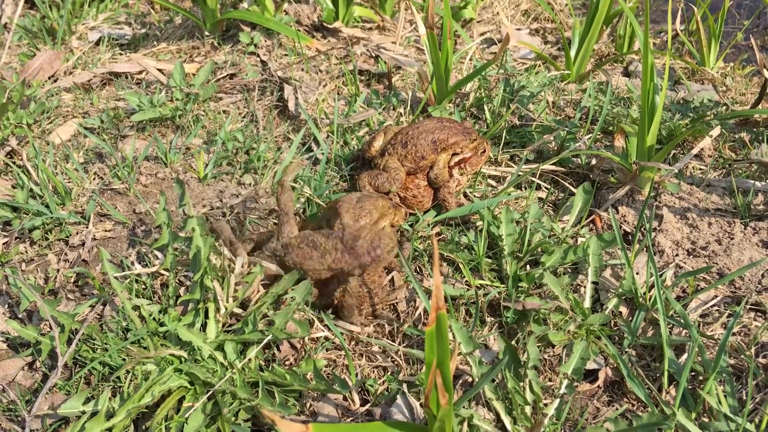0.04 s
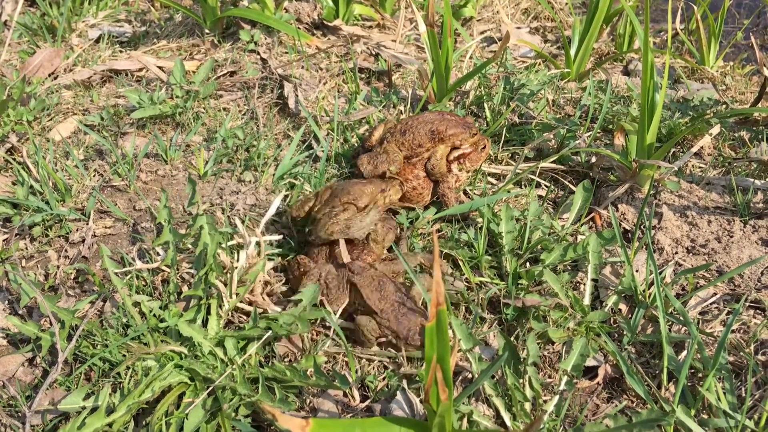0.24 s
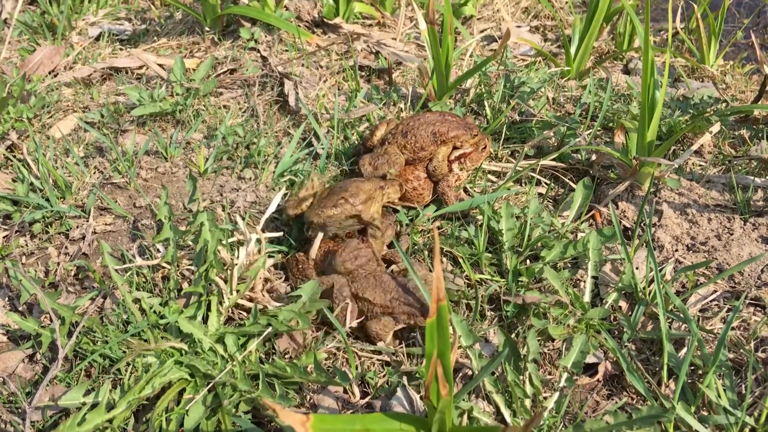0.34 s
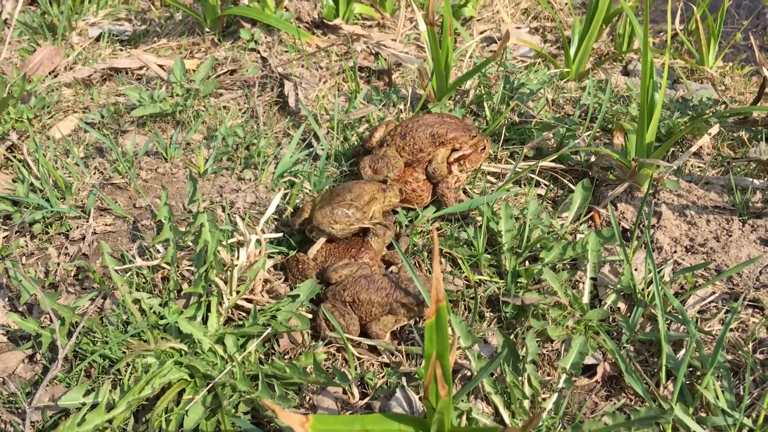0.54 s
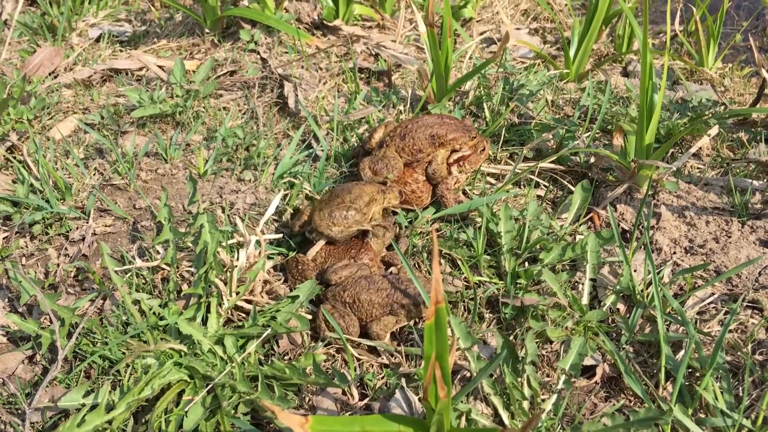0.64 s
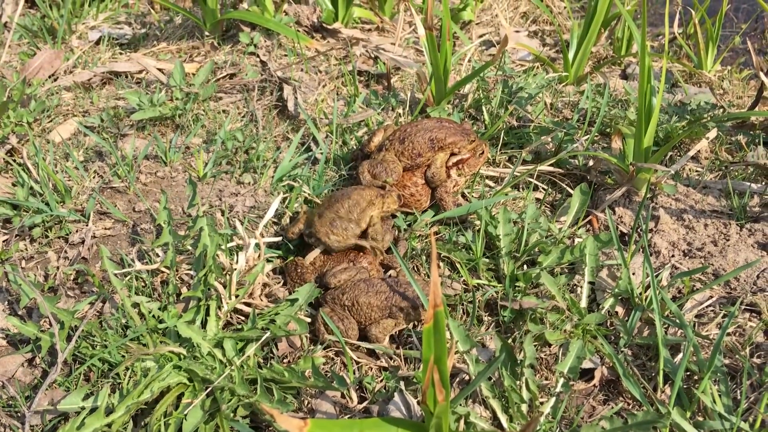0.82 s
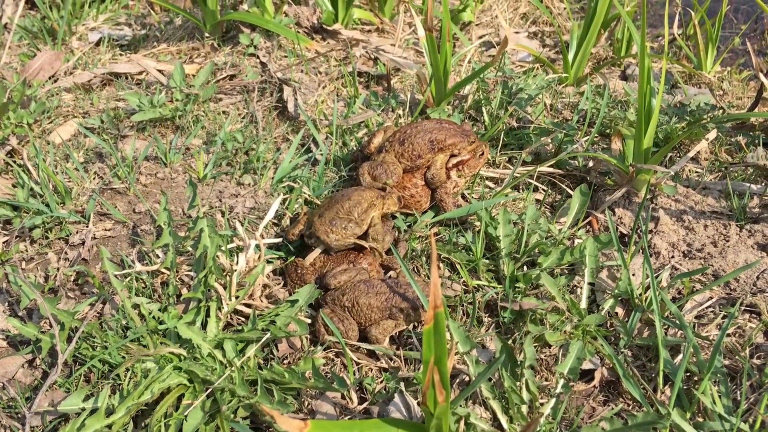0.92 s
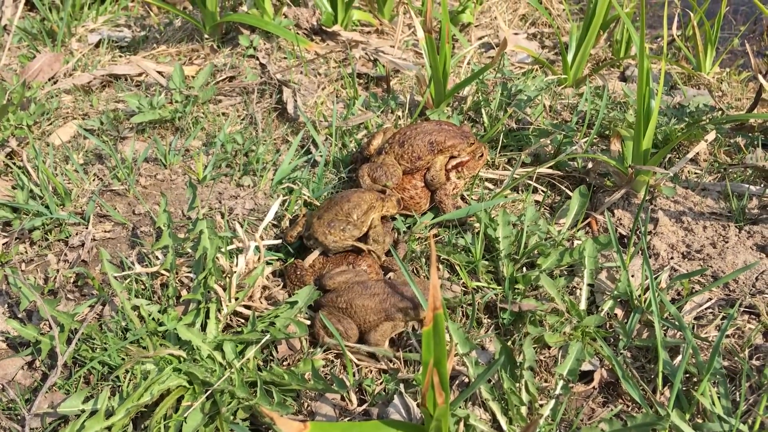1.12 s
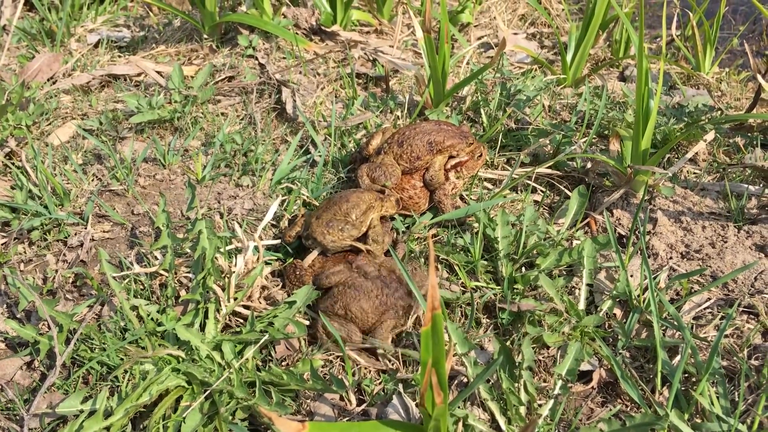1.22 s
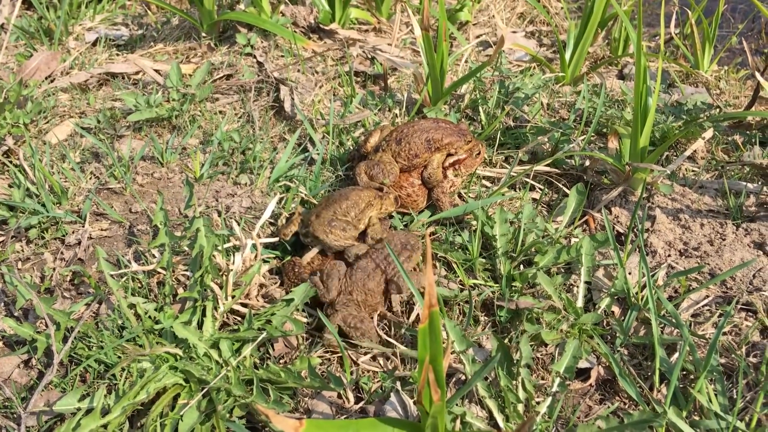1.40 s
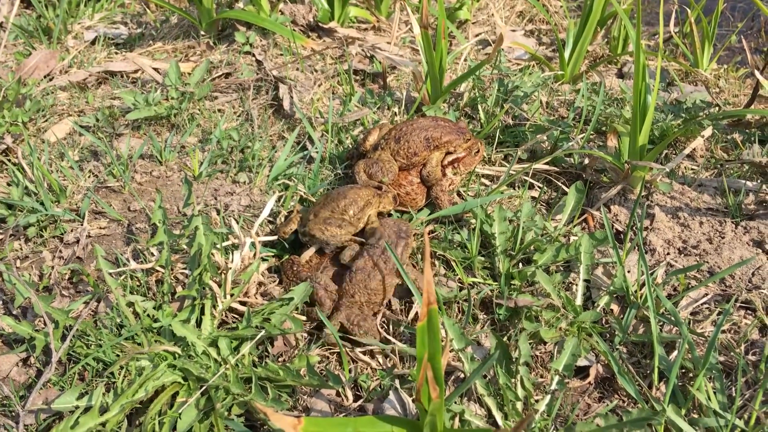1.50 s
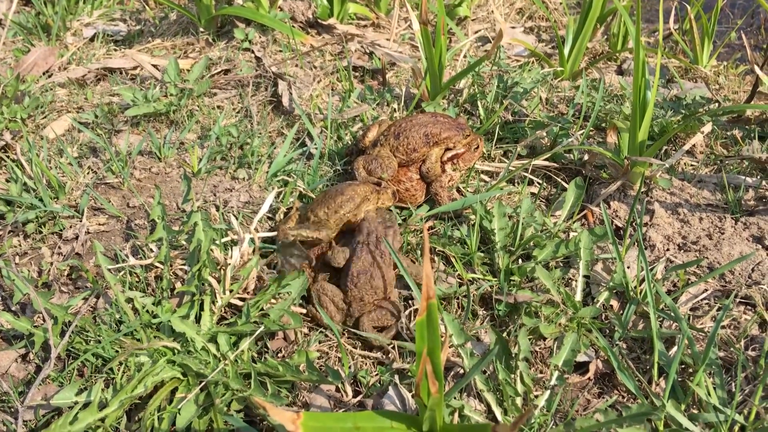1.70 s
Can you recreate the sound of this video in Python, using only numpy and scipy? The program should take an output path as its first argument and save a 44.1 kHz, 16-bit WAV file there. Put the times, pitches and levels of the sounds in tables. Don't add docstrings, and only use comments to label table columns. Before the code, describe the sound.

Short croaky toad chirps, loud and soft, with a brief grass rustle and quiet distant traffic rumble.

```python
import sys
import numpy as np
from scipy import signal
from scipy.fft import rfft, irfft, next_fast_len
from scipy.io import wavfile
from scipy.ndimage import map_coordinates

SR = 44100
rng = np.random.default_rng(int(sys.argv[2]) if len(sys.argv) > 2 else 0)


def generate_wav(signal):
    frames = np.transpose(np.atleast_2d(signal))
    scaled = np.clip(frames, -1, 1) * 32767
    pcm = np.round(scaled).astype(np.int16)
    wavfile.write(sys.argv[1], SR, pcm)


def ratio_of_db(decibels):
    return 10 ** (np.asarray(decibels, float) / 20)


N = 77175

# (frequency [Hz], level [dB per Hz])
TRAFFIC = [(12, -29), (20, -33.5), (38, 9), (188, 0.5), (409, -11), (619, -12.5), (690, -18.5), (1100, -25),
           (1500, -41.5), (1950, -24), (3300, -120)]
# (frequency [Hz], level [dB per Hz])
ENGINE = [(20, -120), (42, -32), (59, -7), (80, -14), (130, -120)]
# (frequency [Hz], level [dB per Hz])
MIC_HISS = [(590, -16), (1000, -5), (1760, -18.5), (2480, -17), (2760, -17), (15700, -27)]
# (start [s], end [s], first pitch [Hz], last pitch [Hz], level [dB])
FAR_NOTE = (.645, .71, 440, 690, -59)

# (time [s], level [dB])
RUSTLE = [(0, -74.5), (.125, -66), (.135, -61), (.19, -50), (.27, -49), (.32, -55.5), (.43, -61),
          (0.452, -63), (.47, -66), (.51, -58.5), (.56, -71.5), (1.22, -75.5), (1.3, -63), (1.36, -69),
          (1.52, -69), (1.6, -72.5), (1.72, -67), (1.745, -59)]
# (frequency [Hz], level [dB per Hz])
BLADE_COLOUR = [(710, -39), (1200, -10), (1600, -10.5), (1730, -9.5), (5020, -6), (12400, 0), (15700, -4)]
# (time [s], peak level [dB], length [s])
BLADE_TICKS = [(.659, -64, .003), (.822, -65.5, 0.0066), (1.681, -53, 0.003), (0.52, -69, .002),
               (.533, -53, 0.0012), (1.622, -60, 0.021), (1.647, -62.5, .022), (0.94, -67, .003),
               (0.99, -66, 0.012), (0.39, -59, 0.01), (.442, -58, .014), (.258, -41, 0.0035),
               (1.4, -70, 0.0073), (0.35, -73, .005)]
# (time [s], peak level [dB], length [s])
LAST_BLADE_TICK = (.3868, -45, .006)
# (time [s], peak level [dB], pitch [Hz], time to fall 60 dB [s])
STEM_KNOCKS = [
    (.151, -50, 2400, .03),
    (.1, -62, 2900, .02),
    (.553, -53, 1500, .016),
    (.553, -56, 900, .014),
]

# (start [s], end [s], time between puffs [s], extra wait after the first puff [s])
CALLS = [
    (.2358, .318, .0061, .0022),
    (.3333, .386, .0057, .0001),
    (.5888, .653, .0066, .0001),
    (.7025, .750, .0063, .0003),
    (.9129, .993, .0064, .0026),
    (1.4419, 1.517, .0064, .0011),
]
# (first puff [Hz], start of held part [Hz], end [Hz])
PITCHES = [(1125, 1160, 1102), (1275, 1090, 1035), (1112, 1104, 1058), (1190, 1072, 1030),
           (1172, 1150, 1008), (1170, 1118, 1038)]
# (level [dB], overtones [dB], rasp [dB], level of the held part [dB])
VOICES = [(-22.5, -5, -1.5, 0.5), (-34.5, -1.6, 1.5, 0), (-25, 1.5, -6.5, -0.5), (-33, -2.5, .1, -3),
          (-23, -1.5, 0, -2.5), (-24, 1.5, 2.2, -3)]
PUFF_COUNTS = (3, 6, 3, 4, 5, 6)
CALLERS = (0, 1, 0, 1, 0, 0)
# (frequency [Hz], width [Hz], level under the main tone [dB])
RESONANCES = [
    [(2130, 990, -21), (3054, 172, -22), (4170, 330, -31), (5540, 790, -30), (6390, 170, -37),
     (8450, 940, -35.5), (9800, 510, -31), (11300, 550, -53), (12100, 360, -32.5), (12900, 400, -35),
     (14500, 790, -24.5), (15000, 440, -26)],
    [(2370, 500, -21.5), (3650, 690, -16.5), (4670, 320, -21), (5860, 610, -25), (7370, 460, -25),
     (9930, 600, -18), (11200, 760, -17.5), (12000, 500, -22), (13600, 490, -22), (14900, 430, -15.5),
     (15000, 330, -12)],
]
# (frequency [Hz], level [dB per Hz])
GRIT = [(900, -60), (1350, -4), (1650, 0), (3000, -4), (4500, -9), (6500, -20), (8000, -60)]

# (frequency [Hz], width [Hz], level [dB])
MIC_DIPS = [(4864, 170, -5), (7630, 840, -2), (10320, 460, -5)]


def unit(x):
    return x / np.sqrt(np.mean(x ** 2) + 1e-20)


def add(out, s, x):
    i = int(s * SR)
    out[i:i + len(x)] += x[:len(out) - i]


def noise():
    return rng.standard_normal(N)


def coloured(x, points):
    size = next_fast_len(len(x) + 8192)
    f, db = np.transpose(points)
    bins_hz = np.fft.rfftfreq(size, 1 / SR)
    gain = ratio_of_db(np.interp(np.log(bins_hz + 1), np.log(f + 1), db))
    return unit(irfft(rfft(x, size) * gain, size)[:len(x)])


def wobble(rate):
    points = rng.standard_normal(int(N * rate / SR) + 4)
    return map_coordinates(points, [np.arange(N) * rate / SR])


def ramp(u):
    return np.sin(np.pi / 2 * np.clip(u, 0, 1)) ** 2


def air():
    traffic = ratio_of_db(-57.5 + 0.8 * wobble(3)) * coloured(noise(), TRAFFIC)
    engine = ratio_of_db(-63) * coloured(noise(), ENGINE)
    hiss = ratio_of_db(-71.5) * coloured(noise(), MIC_HISS)
    out = traffic + engine + hiss
    start, end, hz0, hz1, db = FAR_NOTE
    u = np.linspace(0, 1, int((end - start) * SR))
    phase = 2 * np.pi * np.cumsum(hz0 + (hz1 - hz0) * u ** 2) / SR
    add(out, start, ratio_of_db(db) * np.sin(np.pi * u) * np.sin(phase))
    return out


def grass():
    grains_db, grain_spread_db = -5, 3
    s, db = np.transpose(RUSTLE)
    crackle = noise() * (rng.random(N) < 0.03) * ratio_of_db(grain_spread_db * rng.exponential(size=N))
    blades = coloured(noise() + ratio_of_db(grains_db) * unit(crackle), BLADE_COLOUR)
    motion_db = np.interp(np.arange(N) / SR, s, db) + 2.0 * wobble(60) + 1.6 * wobble(200)
    out = ratio_of_db(motion_db) * blades

    snap = coloured(noise(), [(hz, db * 0.77) for hz, db in BLADE_COLOUR])
    for s, db, length in BLADE_TICKS + [LAST_BLADE_TICK]:
        t = np.arange(int(3 * length * SR)) / SR
        shape = ramp(t / 0.00062) * (1 - ramp(t / length - 0.5))
        add(out, s, ratio_of_db(db) * shape * snap[int(s * SR):][:len(t)])

    t = np.arange(SR // 20) / SR
    for s, db, hz, t60 in STEM_KNOCKS:
        add(out, s, ratio_of_db(db - 60 * t / t60) * ramp(t / 0.00039) * np.sin(2 * np.pi * hz * t))
    return out


def throat(who, hz):
    return np.sqrt(sum(ratio_of_db(db - 6.7 * ((hz - c) / w) ** 2) ** 2 for c, w, db in RESONANCES[who]))


def cord_rasp(who):
    f = np.fft.rfftfreq(N, 1 / SR)
    gain = throat(who, f) / (1 + (7740 / (f + 1)) ** 3)
    return irfft(rfft(noise()) * gain, N) * np.sqrt(SR / 2 / 1100)


def toads():
    first_open_s, last_open = (0.0026, 0.0024), (0.745, 0.752)
    attack_s, shut_s, release_s, release_db = 0.0012, 0.00058, 0.02, -19.5
    ring_t60_s, buzz_delay_s, buzz_edge_s = (0.0068, 0.0043), 0.00021, 0.0013
    sag_db_per_s, sag_curve_db = (-120, -180), (-6, -2)
    onset_bend, bend_s = 0.094, 0.0015
    glide_power, sag_power = (3, 1.2), 0.755
    puff_bright_db, bright_s = (0.5, 7), 0.0064
    low_fade_db, high_fade_db = (-3, -6), (-20, -28)
    rasp_toad_db, grit_db, first_db = (1.5, -2.5), (-29, -21), (-3, -3)
    shimmer_db, jitter = 3.5, 0.3
    ripple, ripple_s = 0.14, 0.0061
    slip, join_s = -0.6, 0.0005

    out = np.zeros(N)
    k = np.arange(2, 16)[:, None]
    high = np.minimum(k - 1, 8) / 8
    rasps = [cord_rasp(who) for who in (0, 1)]
    grit = coloured(noise(), GRIT)
    shimmer = unit(np.array([wobble(120) for _ in range(2 * len(k))])).reshape(2, len(k), N)

    for (start, end, period, wait), (hz0, hz1, hz2), (db, over_db, rasp_db, held_db), n, who in zip(
            CALLS, PITCHES, VOICES, PUFF_COUNTS, CALLERS):
        held = start + wait + n * period
        skew = 1.3 * rng.standard_normal(k.shape)
        for j in range(n + 1):
            is_held = j == n
            s = start + j * period + wait * (j > 0)
            length = end - s + 0.0014 if is_held else 2 * period
            t = np.arange(int(length * SR)) / SR - (s * SR % 1) / SR
            now = slice(int(s * SR), int(s * SR) + len(t))
            early = np.clip((s + t - start) / (held - start), 0, 1)
            late = np.clip((s + t - held) / (end - held), 0, 2)

            hz = hz0 + (hz1 - hz0) * early ** glide_power[who] + (hz2 - hz1) * late ** sag_power
            bent_hz = hz * (1 + onset_bend * np.exp(-t / bend_s))
            first_phase = phase[round(period * SR)] + slip if is_held else 0
            phase = first_phase + 2 * np.pi * np.cumsum(bent_hz) / SR

            if is_held:
                open_s = end
                closing = np.clip(1 - (end - s - t) / release_s, 0, 2)
                level_db = (held_db + sag_db_per_s[who] * t + sag_curve_db[who] * late ** 2
                            + release_db * closing ** 2)
                puffing = ripple * np.exp(-t / ripple_s) * np.cos(2 * np.pi * t / period)
                level = ratio_of_db(level_db) * (1 - puffing)
            else:
                open_range = [first_open_s[who], last_open[who] * period]
                open_s = np.interp((j / (n - 1)) ** 1.55, [0, 1], open_range) + join_s * (j == n - 1)
                level = ratio_of_db(first_db[who] * (1 - 2.0 * j / (n - 1)) ** 2)

            after = np.maximum(t - open_s, 0)
            ring = ratio_of_db(-60 * after ** 2 / (after + shut_s) / ring_t60_s[who])
            sac = ramp(t / attack_s / 2) * ring * np.sin(phase)

            push_db = puff_bright_db[who] * np.sin(np.pi * (0.23 + 0.74 * j / n))
            push_db = push_db * np.exp(-late * (end - held) / bright_s)
            fade_db = (low_fade_db[who] + high_fade_db[who] * high) * late ** 2
            unsteady_db = shimmer_db * (0.35 + high) * shimmer[0][:, now]
            bright_db = over_db * high + high * push_db + fade_db + unsteady_db
            cord_phase = k * (phase - np.pi / 2) + jitter * k * shimmer[1][:, now] / 2 + skew
            cords = ratio_of_db(bright_db) * throat(who, k * hz) * np.cos(cord_phase)

            crest = (1 + np.sin(phase)) ** 2 / 2
            rasp_fade = np.exp(-t / bright_s) if is_held else 1
            rasp = ratio_of_db(rasp_db + rasp_toad_db[who] + push_db) * rasp_fade * crest * rasps[who][now]

            shutting = ramp((t - open_s) / buzz_edge_s + high - 0.5)
            flow = ramp((t - buzz_delay_s) / buzz_edge_s) * (1 - shutting)
            voice = sac + (flow * cords).sum(0) + flow[-1] * rasp
            if not is_held:
                voice = voice + ratio_of_db(grit_db[who]) * flow[0] * grit[now]
            add(out, s, ratio_of_db(db) * level * voice)
    return out


def ground_scatter(calls):
    echo_db, echo_t60_s = -33.5, 0.14
    t = np.arange(SR // 4) / SR
    tail = rng.standard_normal(len(t)) * ratio_of_db(-60 * t / echo_t60_s)
    return ratio_of_db(echo_db) * signal.fftconvolve(calls, tail / np.linalg.norm(tail))[:N]


def scene():
    calls = toads()
    return (air() + grass() + calls + ground_scatter(calls))[None]


def low_pass(x):
    return signal.sosfilt(signal.butter(12, 16970, fs=SR, output="sos"), x)


def record(dry):
    edge_hz, edge_db_per_khz = 15840, -39
    f = np.fft.rfftfreq(N, 1 / SR)
    dips_db = sum(db * np.exp(-((f - c) / w) ** 2) for c, w, db in MIC_DIPS)
    edge_db = edge_db_per_khz * np.maximum(f - edge_hz, 0) / 1000
    mix = irfft(rfft(dry) * ratio_of_db(dips_db + edge_db), N)
    return low_pass(mix)


dry = scene()
out = record(dry)
generate_wav(out)
```